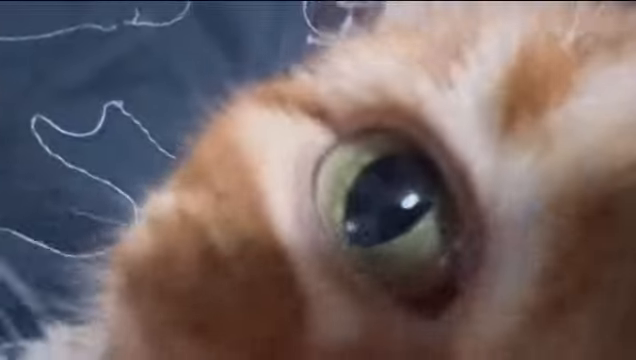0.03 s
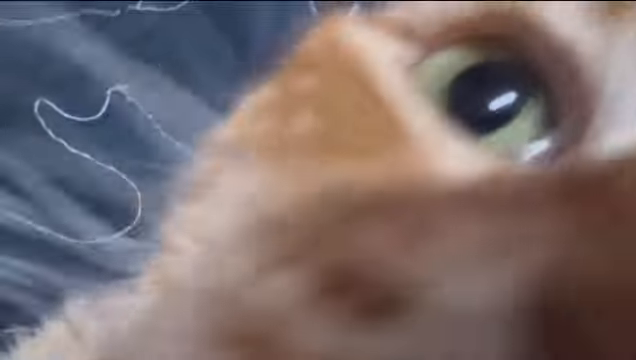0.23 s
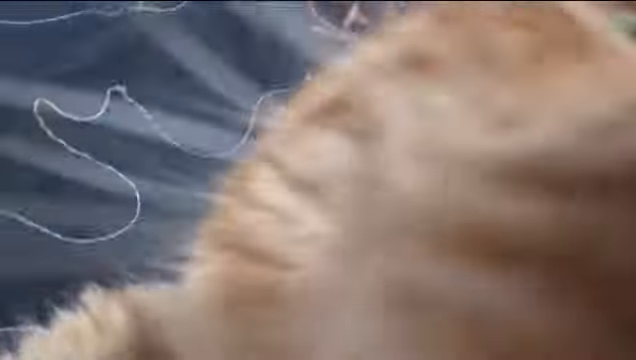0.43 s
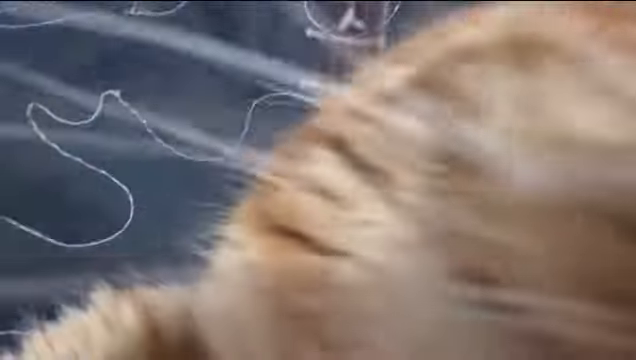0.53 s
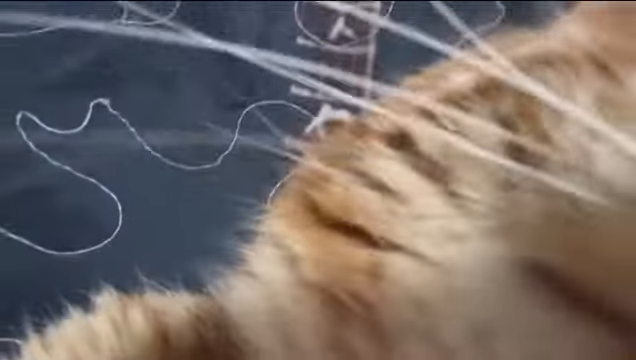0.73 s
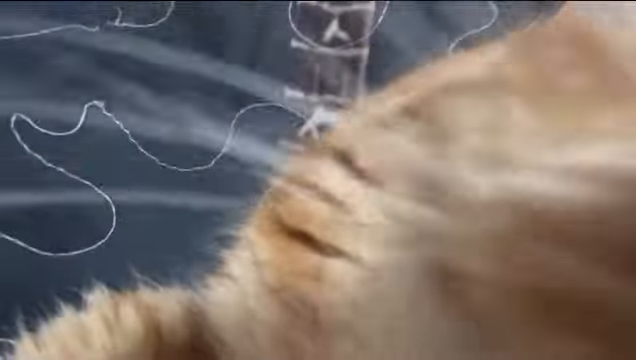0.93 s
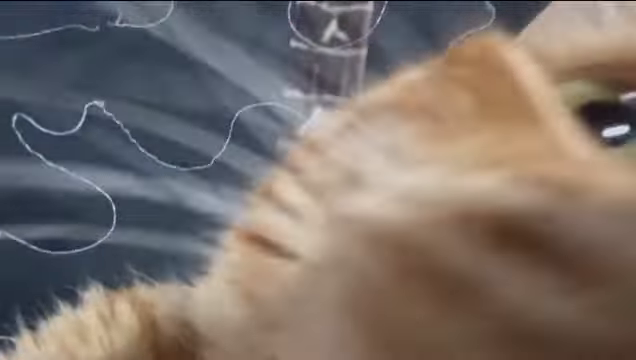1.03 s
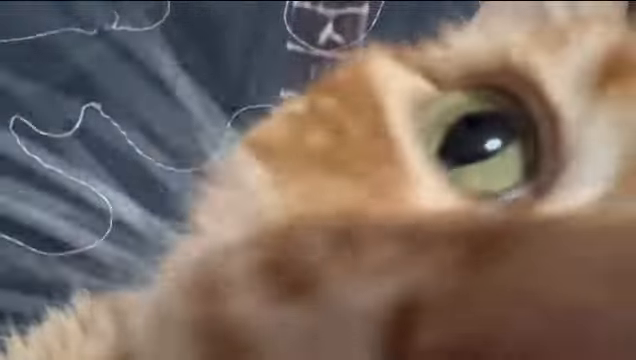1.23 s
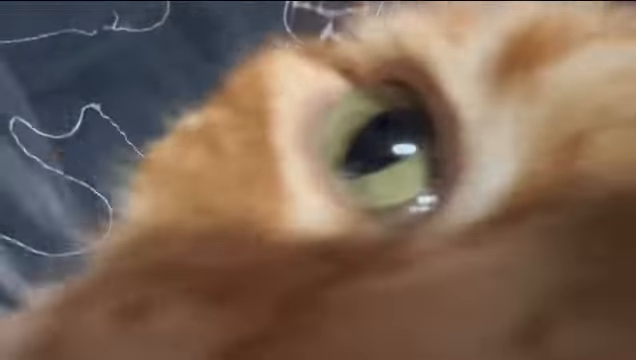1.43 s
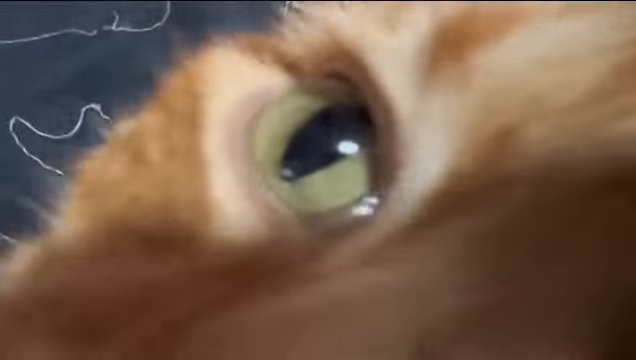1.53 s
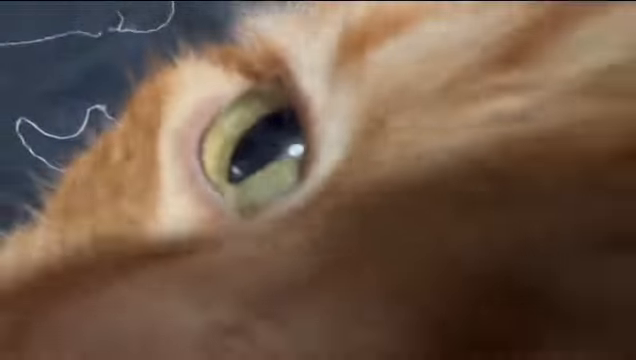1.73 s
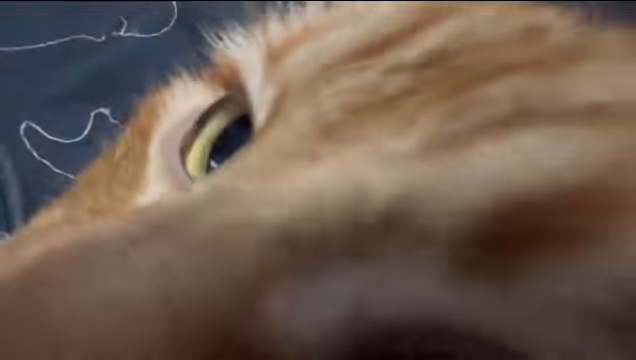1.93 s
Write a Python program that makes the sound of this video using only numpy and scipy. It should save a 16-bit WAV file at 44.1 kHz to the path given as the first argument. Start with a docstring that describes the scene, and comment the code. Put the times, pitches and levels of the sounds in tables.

```python
"""A cat's purr, its face against a phone: the larynx shuts about 26 times a second, and each closure is a
short, sliding low ring felt through the contact. The beat also gates the breath, which is shaped noise:
whistling nose resonances going in, hiss and low buffeting of the microphone going out.
Sharper closures add broad noise snaps; pushes on the case add sagging hums; narrow noise bands make a few
faint airy whistles, over quiet room noise."""
import sys
import numpy as np
from scipy import signal
from scipy.fft import rfft, irfft, next_fast_len
from scipy.io import wavfile

SR = 44100
rng = np.random.default_rng(int(sys.argv[2]) if len(sys.argv) > 2 else 0)


def store_wav(level_fs):
    """Save 16-bit WAV to argv[1]."""
    pcm = np.round(np.clip(np.atleast_2d(level_fs), -1, 1) * 32767)
    wavfile.write(sys.argv[1], SR, pcm.T.astype(np.int16))


N = 88200

# larynx closures: t/s, beats so far
BEATS = [(-.025, 0), (.198, 6), (.424, 12), (.985, 27), (1.075, 29), (1.158, 31), (1.311, 35), (1.472, 39),
         (1.740, 46), (2.007, 53)]
# face contact: t/s, thump level before THUMP_TRIM_DB/dB, ring f/Hz, left over right/dB, left lead/rad
CONTACT = [(0, -36.5, 75.6, 1, 0.26), (0.138, -39.5, 61.7, 0, .38), (0.208, -27.5, 97.4, 0.5, 0.42),
           (0.289, -33, 78.5, 0.5, 0.35), (.32, -36, 83, 0, 0.56), (.36, -27, 94, 0.5, .35),
           (0.438, -18, 100.3, 0.5, 0.42), (.51, -26.5, 92.6, 0, 0.4), (0.561, -32, 71.3, 0, 0.28),
           (.62, -47, 71, -0.5, 0.37), (.73, -49, 66.4, 0, 0.3), (.79, -48.5, 78, -1, 0.26),
           (1, -52.5, 86, -0.5, .35), (1.05, -45.5, 91.5, 0, 0.38), (1.131, -49, 96, -0.5, 0.38),
           (1.18, -40.5, 89.6, -1, 0.42), (1.319, -42, 99, -1, 0.55), (1.439, -36.5, 96, 6, 0.78),
           (1.559, -42.5, 85, 4.5, 0.93), (1.68, -55.5, 75, 3.5, 1), (1.82, -55.5, 85.6, 6, 1),
           (1.869, -46.5, 88, 5.5, 0.85), (2, -47, 86.5, 2.5, .6)]
# breath on the microphone: t/s, rumble level/dB, flutter level/dB
BUFFET = [(0, -46.5, -63.5), (.14, -49, -62), (.22, -38, -36.5), (.31, -63, -53), (.35, -29, -34.5),
          (.43, -33, -24), (.505, -24, -26.5), (.52, -30, -56.5), (.56, -34.5, -54.5), (.6, -42, -59),
          (.63, -44.5, -54.5), (.68, -41, -51.5), (.74, -41.5, -60.5), (.79, -55, -60.5), (.97, -75, -63.5),
          (1.1, -53.5, -53.5), (1.3, -61, -66), (1.45, -47.5, -49), (1.55, -54.5, -63.5), (1.65, -46, -58),
          (1.8, -53.5, -66.5), (2, -58.5, -65)]
# rumble spectrum: f/Hz, relative level/dB
RUMBLE_SPECTRUM = [(15, -35.5), (35, -8.5), (55, -1), (75, -3.5), (100, -3), (140, -10), (220, -18),
                   (400, -76)]
# flutter spectrum: f/Hz, relative level/dB
FLUTTER_SPECTRUM = [(100, -3), (180, 2), (280, 0), (420, -11.5), (600, -16), (800, -45), (1500, -64.5),
                    (3000, -81)]
# gate centres after the closure: t/s, hiss puff/beats, nose swell/beats, flutter/beats
GATE_CENTRES = [(0, 0.61, 0.55, 0.15), (.12, 0.7, 0.67, 0.29), (.15, .9, 1, 0.23), (.29, 1, 0.99, 0.31),
                (.33, 0.76, 0.89, .03), (.95, 0.79, 0.77, 0.047), (1, 0.8, 0.97, 0.23),
                (1.72, .95, 0.94, .2), (1.77, 0.6, 0.33, .2), (2, .5, 0.53, 0.22)]
# room noise spectrum: f/Hz, relative level/dB
ROOM_SPECTRUM = [(120, -45), (200, -16.5), (608, -27.5), (743, -24), (1050, -28), (2760, -43),
                 (4120, -34.5), (8230, -51), (12700, -47), (15600, -41)]
# breath drawn through the nose: t/s, level before trim/dB
BREATH_IN = [(0, -89), (.05, -84), (.075, -74), (.11, -72.5), (.14, -95), (.17, -80), (.2, -64),
             (.235, -56.5), (.27, -72), (.31, -85), (.345, -60), (.4, -73.5), (.6, -74.5), (.76, -75),
             (.79, -69.5), (.9, -80.5), (.99, -84), (1.03, -62.5), (1.07, -55), (1.11, -55), (1.2, -71.5),
             (1.25, -100), (1.31, -87.5), (1.39, -58), (1.43, -56), (1.47, -55), (1.51, -73), (1.55, -106),
             (1.6, -73), (1.7, -74), (1.76, -80.5), (1.795, -69.5), (1.87, -75.5), (2, -87)]
# nose resonances: f/Hz, width/Hz, relative level/dB
NOSE_RESONANCES = [(940, 130, 0.5), (2290, 380, -3), (3120, 650, -7.5), (3636, 200, -2), (6500, 500, -11)]
# nose balance: f/Hz, left over right/dB
NOSE_PAN = [(600, 2), (2500, 14), (5000, 29), (10000, -29)]
# nose phase, also used for snaps and room: f/Hz, left lead/rad
NOSE_LEAD = [(0, 5.5), (600, 0), (950, 4), (2070, 4.5), (2670, 9.5), (3450, 9), (4130, 9.5), (5080, 8.5),
             (7670, -9), (9650, 10), (11200, -12), (13100, 12), (14300, 6), (15300, 9.5)]
# breath hissing out past the microphone: t/s, level before trim/dB
BREATH_OUT = [(0, -100), (.05, -98), (.075, -80.5), (.11, -83), (.14, -100), (.2, -97), (.23, -75.5),
              (.26, -97), (.32, -106), (.342, -69.5), (.375, -64), (.41, -62), (.45, -60.5), (.49, -64.5),
              (.6, -70), (.86, -73.5), (.905, -74), (.93, -100), (1.02, -96), (1.065, -70.5),
              (1.105, -69.5), (1.145, -73.5), (1.18, -98), (1.33, -100), (1.39, -85), (1.47, -88.5),
              (1.52, -100), (1.63, -87.5), (2, -109)]
# hiss spectrum: f/Hz, relative level/dB
HISS_SPECTRUM = [(500, -5.5), (800, -6), (1500, -11.5), (2300, -9.5), (3800, -9), (5300, -21.5),
                 (7000, -12), (8200, -31.5), (9300, -3.5), (9800, -8.5), (10500, -10.5), (13800, -11.5),
                 (14800, -11), (15700, -33.5)]
# hiss balance: f/Hz, left over right/dB
HISS_PAN = [(1000, 9.5), (3000, 0), (6000, 6), (10000, -1.5)]
# hiss phase: f/Hz, left lead/rad
HISS_LEAD = [(0, 13), (690, 0.8), (1120, 1.3), (1550, -1.1), (2840, 4.5), (4220, 0.6), (5080, 2.2),
             (5680, -1.5), (7670, -2), (8700, -1), (11100, -8.5), (13000, -16.5), (14500, -5.5),
             (15300, -15)]
# sharper closures: t before CLICK_LAG_S/s, envelope level before trim and tail/dB
CLICKS = [(0.074, -58.5), (0.167, -54), (0.198, -49.5), (0.272, -61), (0.313, -63), (1.026, -58.5),
          (1.043, -41), (1.083, -37), (1.122, -47), (1.164, -45.5), (1.444, -52), (1.791, -57),
          (1.828, -67)]
# snap spectrum: f/Hz, relative level/dB
SNAP_SPECTRUM = [(150, -29), (400, 9.5), (1000, 1), (2500, -4.5), (4000, -7), (4800, -27.5), (6000, -18.5),
                 (8000, -37), (16000, -37)]
# case hums as the face pushes: t/s, length/s, start f/Hz, end f/Hz, level/dB
BUMPS = [(0.501, 0.12, 92, 65.3, -25.5), (0.647, .12, 75, 61, -40)]
# airy whistles: t/s, length/s, start f/Hz, end f/Hz, width/Hz, level before pan/dB
AIRY = [(1.575, .13, 3550, 3700, 900, -78), (1.62, .2, 4800, 4750, 300, -88),
        (1.915, .075, 4300, 3900, 400, -81), (1.89, .07, 6000, 6100, 600, -86)]

THUMP_TRIM_DB, RING_T60_S, THUMP_LAG_S = 5.5, 0.062, 0.00043
SLIDE_FROM_HZ, SLIDE_S, PEAK_S = 720, 0.0023, 0.012
UNEVEN_DB = 1.2  # standard deviation from beat to beat
SHUT_AT_BEATS, SHUT_HALF_BEATS = 0.16, 0.11  # airway seal: centre after an opening, half-width
CLICK_LAG_S = 0.0015
ROOM_DB = -73
BASS_CORNER_HZ, TOP_HZ = 28, 15750


def amp(db):
    """dB to gain."""
    return 10 ** (np.asarray(db) / 20)


def unit(x):
    """Scaled to rms 1."""
    return x / np.sqrt(np.mean(x ** 2) + 1e-20)


def along(points, hz):
    """(Hz, value) points interpolated on a log axis."""
    f, v = np.transpose(points)
    return np.interp(np.log(hz + 1), np.log(f + 1), v)


def spectrum(points):
    """Gain as a function of Hz from (Hz, dB) points."""
    return lambda hz: amp(along(points, hz))


def curves(rows):
    """One value per sample for each column after the time."""
    s, *cols = np.transpose(rows)
    return [np.interp(np.arange(N) / SR, s, c) for c in cols]


def filtered(x, response):
    """x through a complex response of frequency."""
    m = next_fast_len(N + SR // 2)
    return irfft(rfft(x, m) * response(np.fft.rfftfreq(m, 1 / SR)), m)[..., :N]


def noise(colour, pan, lead, alike):
    """Stereo noise, mean channel at rms 1; alike is the port correlation before pan and phase."""
    a, b = rng.standard_normal((2, N))
    pair = np.array([a, alike * a + np.sqrt(1 - alike ** 2) * b])
    halves = [0.5, -0.5]

    def response(hz):
        level = amp(np.outer(halves, along(pan, hz)))
        phase = np.exp(1j * np.outer(halves, along(lead, hz)))
        return colour(hz) * level * phase

    pair = filtered(pair, response)
    return pair / np.sqrt(np.mean(pair.mean(0) ** 2))


def gate(centre_beats, rise_beats, fall_beats, leak_db, sealed):
    """Rms-1 gate, open once a beat; the seal takes the fraction sealed off the leak between openings."""
    beat = curves(BEATS)[0] - centre_beats
    nearest = np.round(beat)
    u = beat - nearest
    size = amp(UNEVEN_DB * rng.standard_normal(80))[nearest.astype(int) + 2]
    seal = np.exp(-((u - SHUT_AT_BEATS) / SHUT_HALF_BEATS) ** 4)
    leak = amp(leak_db) * (1 - sealed * seal)
    opening = np.exp(-(u / np.where(u < 0, rise_beats, fall_beats)) ** 2)
    return unit(leak + size * opening)


def thumps():
    """Each closure is a short ring that slides fast to the contact's pitch, then sags as it decays."""
    beat_s, count = np.transpose(BEATS)
    times, level_db, ring_hz = np.transpose(CONTACT)[:3]
    out = np.zeros(N + 2 * SR)  # one second of margin at each end
    t = np.arange(SR // 8) / SR
    closures = np.interp(np.arange(count[-1]), count, beat_s)
    for at, (size, tune) in zip(closures, rng.standard_normal((80, 2))):
        hz = np.interp(at, times, ring_hz) * amp(UNEVEN_DB / 4 * tune)
        slide = (SLIDE_FROM_HZ - hz) * SLIDE_S * (1 - np.exp(-t / SLIDE_S))
        turns = hz * t * (1 - 2 * t) + slide
        envelope = np.minimum(t / PEAK_S, 1) ** 2 * amp(-60 * t / RING_T60_S)
        ring = envelope * np.sin(2 * np.pi * turns)
        db = np.interp(at + PEAK_S, times, level_db) + THUMP_TRIM_DB + UNEVEN_DB * size
        start = SR + round((at + THUMP_LAG_S) * SR)
        out[start:][:len(t)] += amp(db) * ring / np.abs(ring).max()
    return out[SR:SR + N]


def buffeting():
    """Breath on the microphone port: a broadly pulsing low rumble, and higher flutter in puffs."""
    rumble_db, flutter_db = curves(BUFFET)
    rumble = unit(filtered(rng.standard_normal(N), spectrum(RUMBLE_SPECTRUM)))
    flutter = unit(filtered(rng.standard_normal(N), spectrum(FLUTTER_SPECTRUM)))
    rumble_gate = gate(0.42, 0.53, 0.58, leak_db=-1.8, sealed=0.13)
    flutter_gate = gate(curves(GATE_CENTRES)[2], 0.27, 0.29, leak_db=-25.5, sealed=0.1)
    return amp(rumble_db) * rumble_gate * rumble + amp(flutter_db) * flutter_gate * flutter


def through_case(x):
    """Low sound reaches both ports, the left earlier in phase, the balance shifting."""
    pan_db, lead = curves(CONTACT)[2:]
    z = signal.hilbert(x)
    return np.array([amp(side * pan_db) * (z * np.exp(1j * side * lead)).real for side in (0.5, -0.5)])


def room():
    """Steady, quiet room noise, weakly alike at the two ports."""
    pan = [(500, 14.5), (3000, 3.5), (10000, 2)]  # f/Hz, left over right/dB
    return amp(ROOM_DB) * noise(spectrum(ROOM_SPECTRUM), pan, NOSE_LEAD, alike=0.33)


def nose_response(hz):
    """Parallel resonances of alternating sign, rolled off above 4600 Hz."""
    total = 0
    for k, (centre_hz, width_hz, db) in enumerate(NOSE_RESONANCES):
        damping = 1j * hz * width_hz
        total = total + (-1) ** k * amp(db) * damping / (centre_hz ** 2 - hz ** 2 + damping)
    return total / (1 + (hz / 4600) ** 4)


def breath_in():
    """Noise through the nose resonances swells each beat, then is cut off quickly by the closure."""
    nose = noise(nose_response, NOSE_PAN, NOSE_LEAD, alike=0.73)
    swell = gate(curves(GATE_CENTRES)[1], 0.16, 0.036, leak_db=-5, sealed=0.92)
    return amp(curves(BREATH_IN)[0] - 4.0) * swell * nose


def breath_out():
    """Outgoing breath hisses past the microphone in one puff a beat."""
    hiss = noise(spectrum(HISS_SPECTRUM), HISS_PAN, HISS_LEAD, alike=0.77)
    puff = gate(curves(GATE_CENTRES)[0], 0.29, 0.16, leak_db=-17.5, sealed=1.0)
    return amp(curves(BREATH_OUT)[0] + 0.5) * puff * hiss


def clicks():
    """Sharper closures: short broad noise snaps with a softer tail, louder on the left."""
    t = np.arange(N) / SR - CLICK_LAG_S
    shape = np.zeros(N)
    for s, db in CLICKS:
        away = np.abs(t - s)
        shape += amp(db - 60 * away / np.where(t < s, 0.002, 0.007))
        shape += (t > s) * amp(db - 7 - 60 * away / 0.054)
    pan = [(500, 1.7), (3000, 8.2), (10000, 1.5)]  # f/Hz, left over right/dB
    return amp(-2.5) * shape * noise(spectrum(SNAP_SPECTRUM), pan, NOSE_LEAD, alike=0.88)


def bumps():
    """The pushed case hums low, sagging in pitch under a quick swell and slower fade."""
    t = np.arange(N) / SR
    out = np.zeros(N)
    for s, length, start_hz, end_hz, db in BUMPS:
        u = np.clip((t - s) / length, 0, 1)
        turns = np.cumsum(start_hz + (end_hz - start_hz) * u) / SR + rng.random()
        out += amp(db) * np.sin(np.pi * u ** 0.72) * np.sin(2 * np.pi * turns)
    return out


def whistles():
    """Slow noise on a gliding sine makes a narrow airy band under a smooth swell, louder on the left."""
    t = np.arange(N) / SR
    out = np.zeros(N)
    for s, length, start_hz, end_hz, width_hz, db in AIRY:
        u = np.clip((t - s) / length, 0, 1)
        slow = unit(filtered(rng.standard_normal(N), lambda hz: np.exp(-(2 * hz / width_hz) ** 2)))
        swell = np.sqrt(np.abs(np.sin(np.pi * u)))
        turns = np.cumsum(start_hz + (end_hz - start_hz) * u) / SR
        out += amp(db) * swell * slow * np.sin(2 * np.pi * turns)
    return out * amp([[4], [-4]])


def scene():
    """Contact sound, breath, snaps, whistles and the quiet room."""
    contact = through_case(thumps() + buffeting() + bumps())
    return contact + room() + breath_in() + breath_out() + clicks() + whistles()


def record(dry):
    """The phone rolls off the deep bass and keeps nothing above its band limit."""
    return filtered(dry, lambda hz: (hz < TOP_HZ) * hz ** 2 / (hz ** 2 + BASS_CORNER_HZ ** 2))


dry = scene()
out = record(dry)
store_wav(out)
```